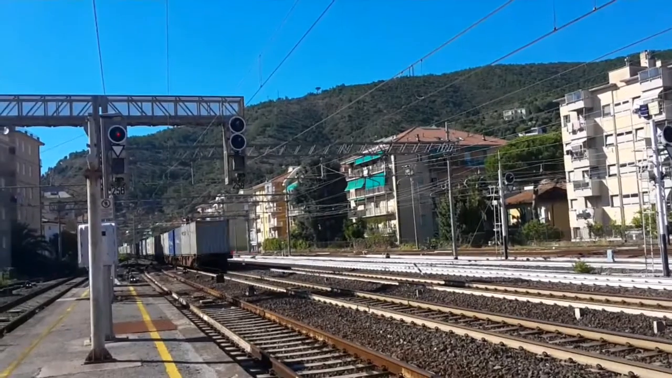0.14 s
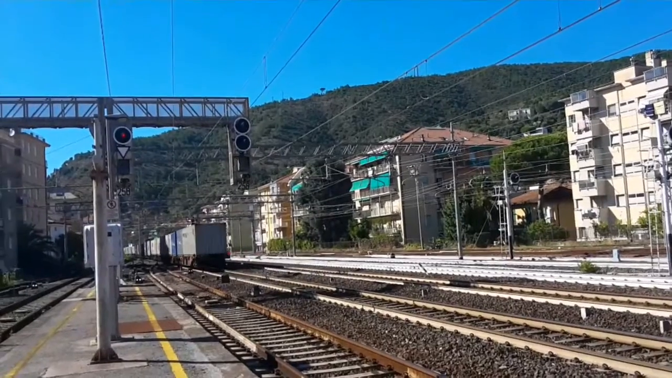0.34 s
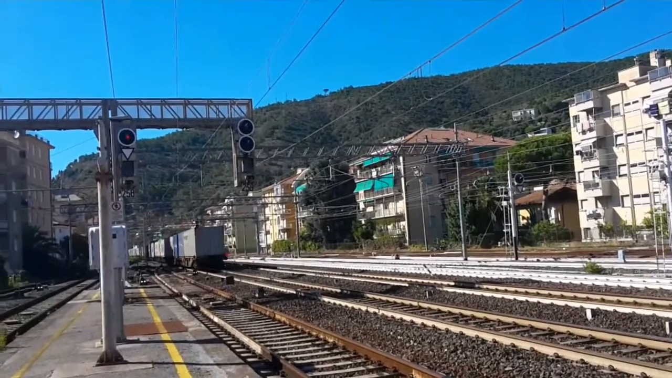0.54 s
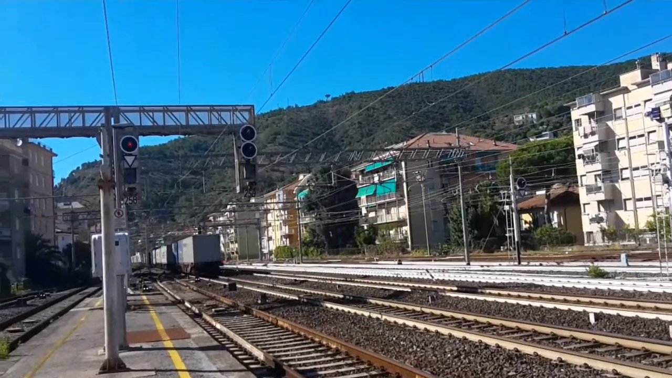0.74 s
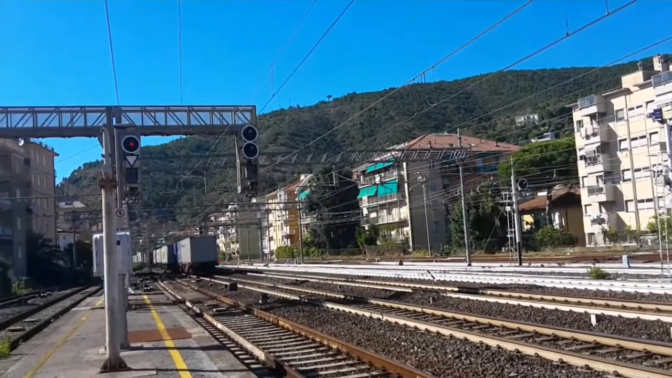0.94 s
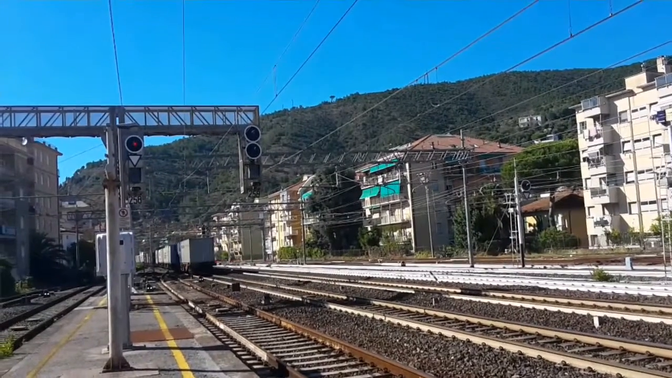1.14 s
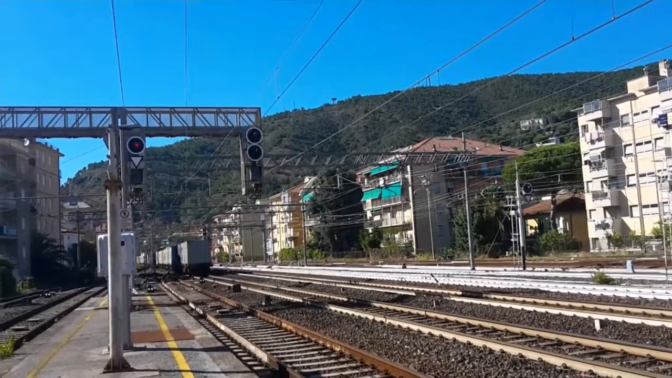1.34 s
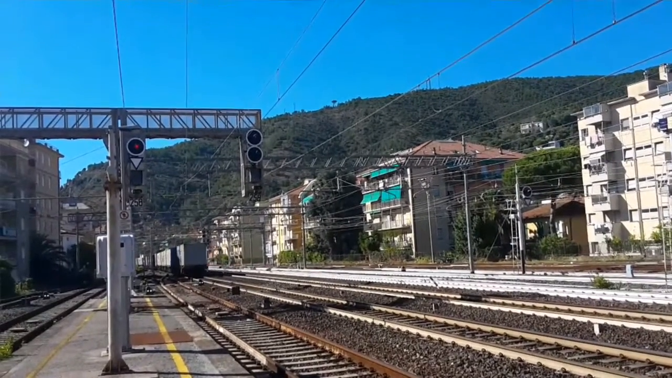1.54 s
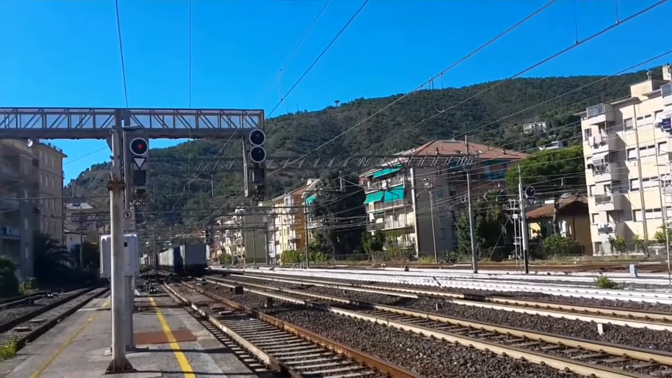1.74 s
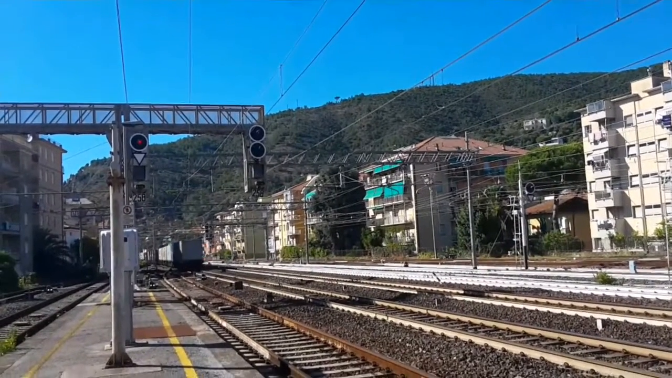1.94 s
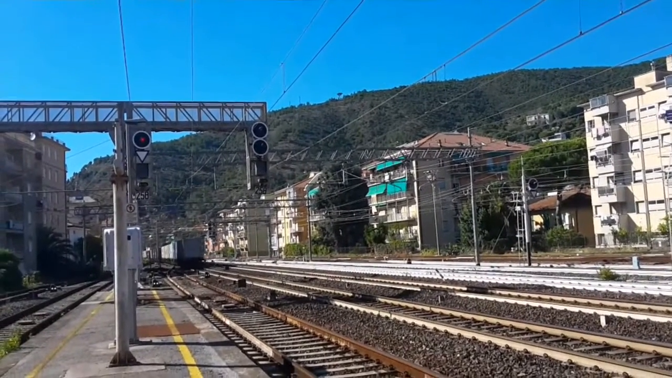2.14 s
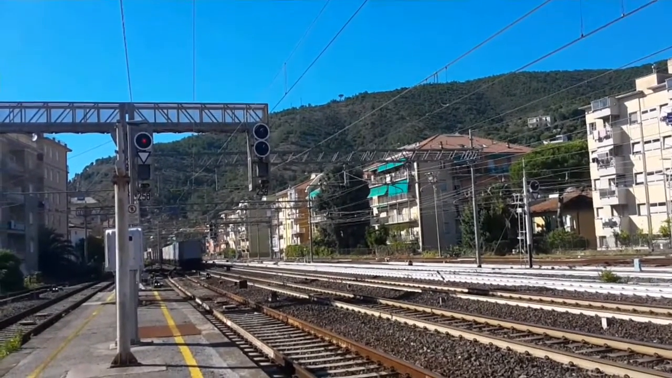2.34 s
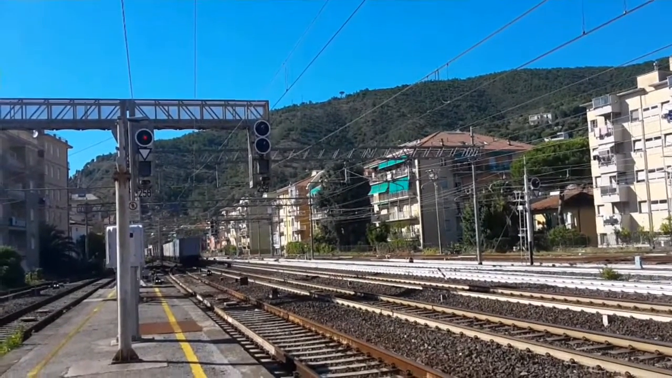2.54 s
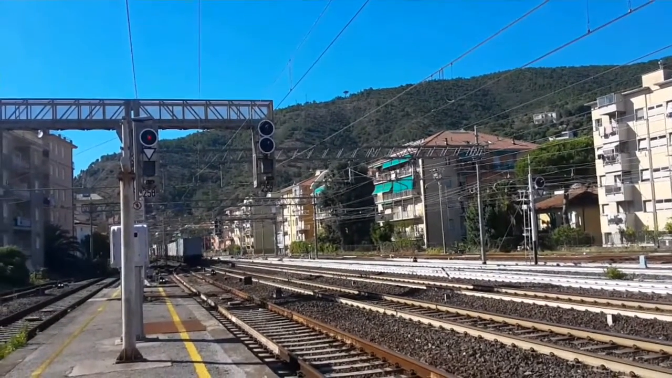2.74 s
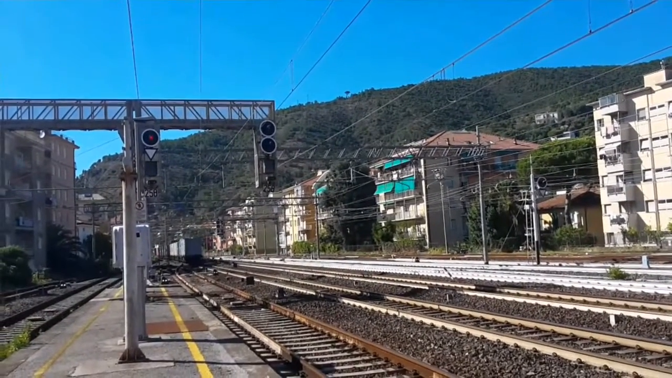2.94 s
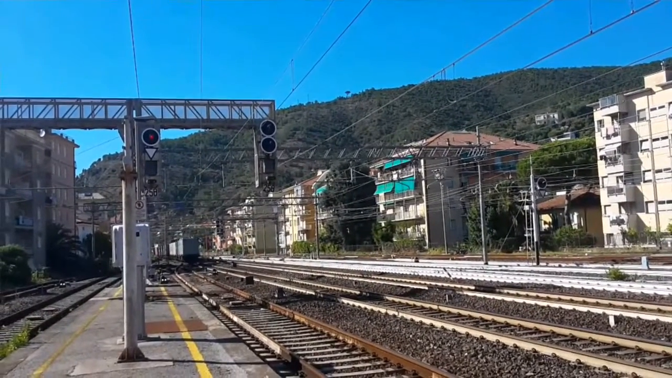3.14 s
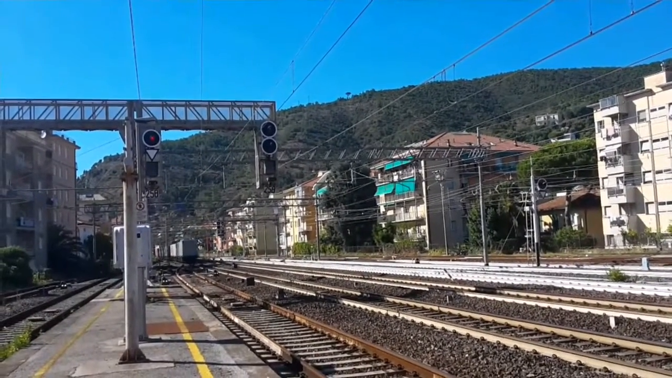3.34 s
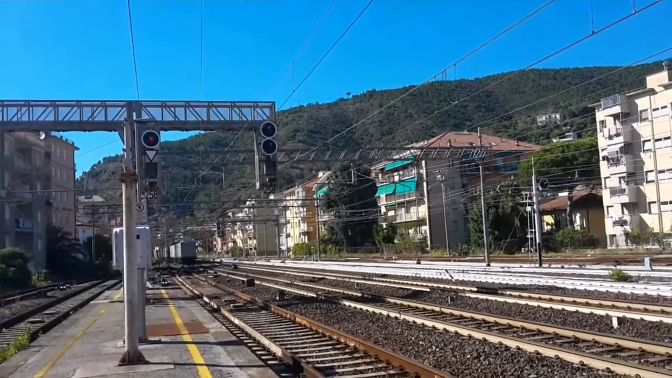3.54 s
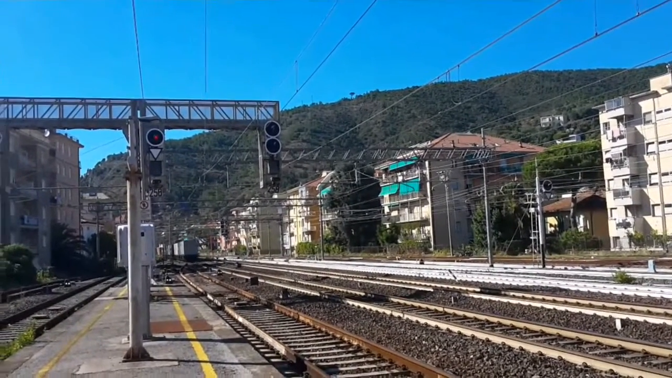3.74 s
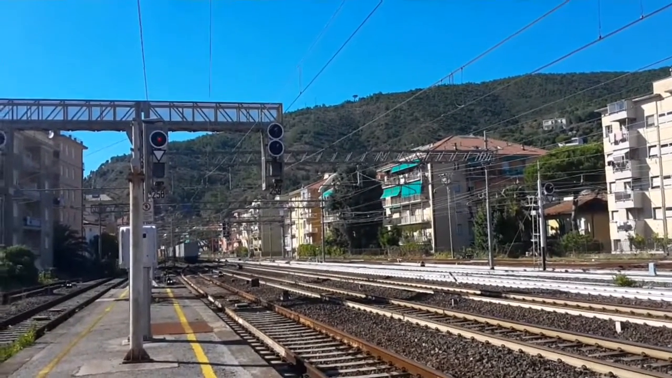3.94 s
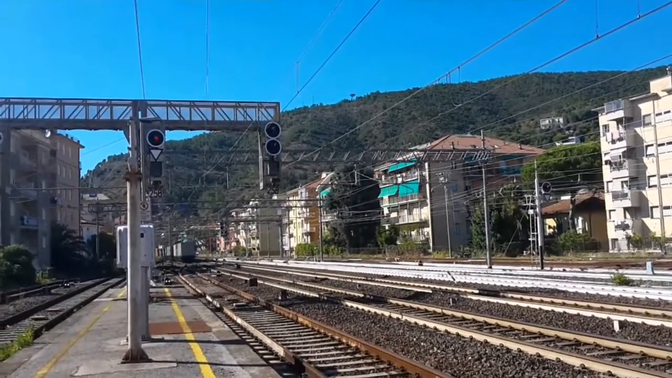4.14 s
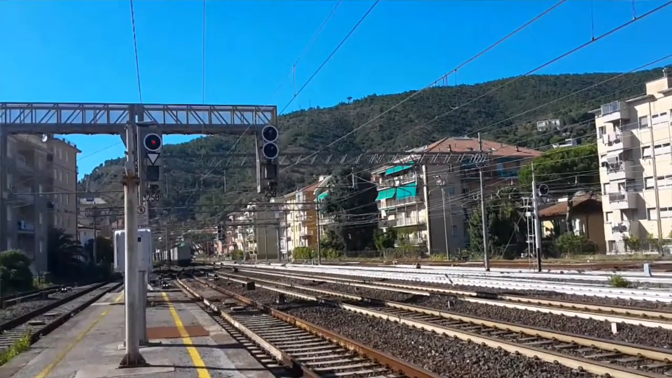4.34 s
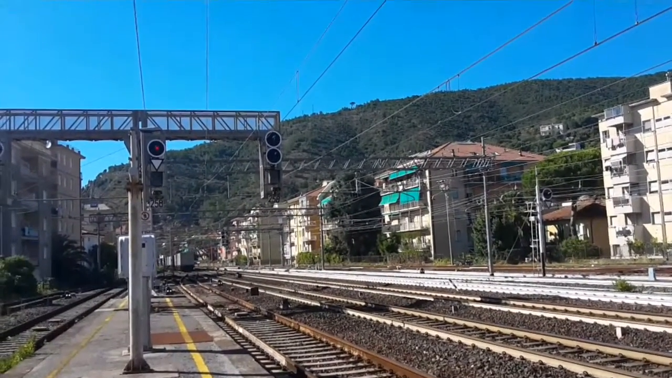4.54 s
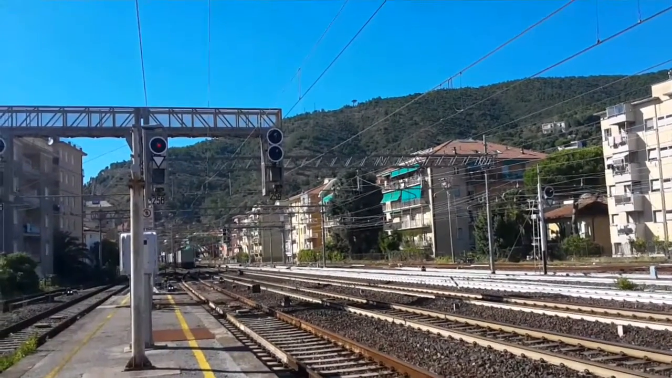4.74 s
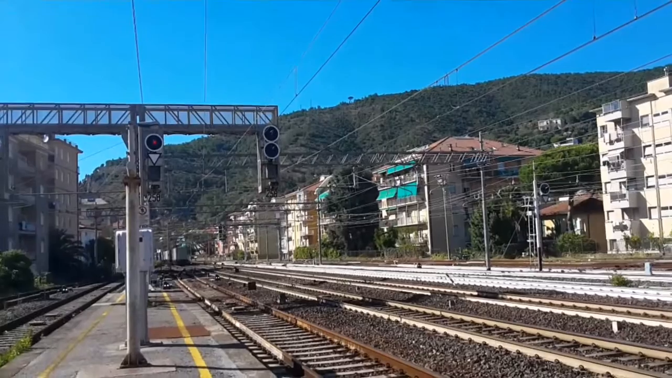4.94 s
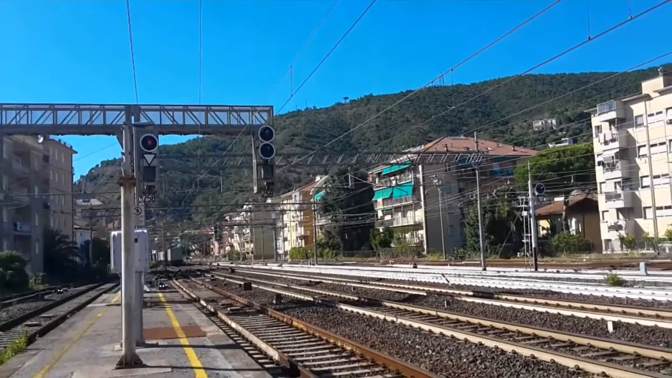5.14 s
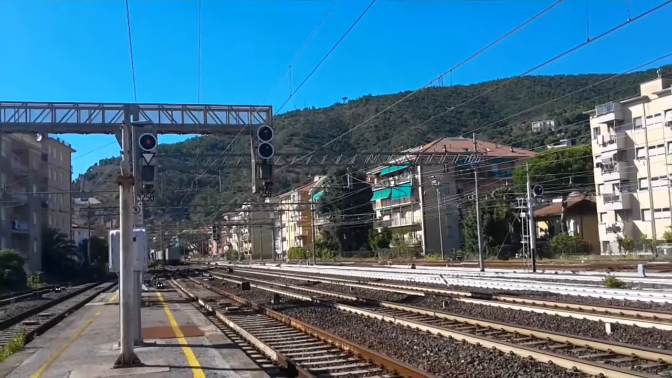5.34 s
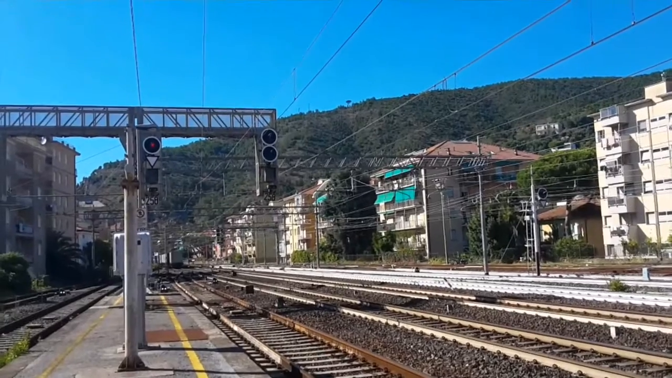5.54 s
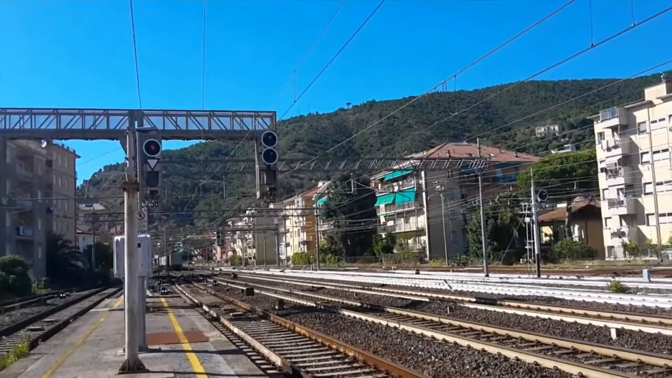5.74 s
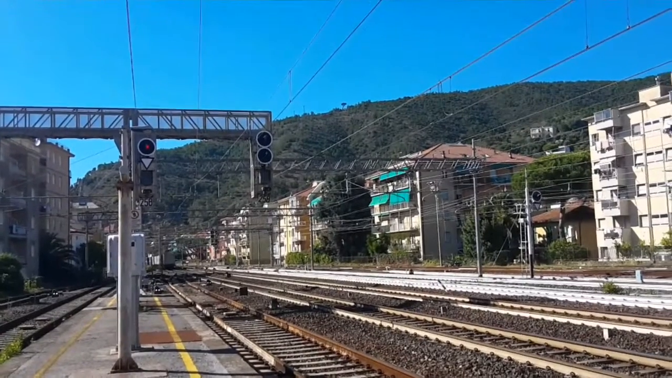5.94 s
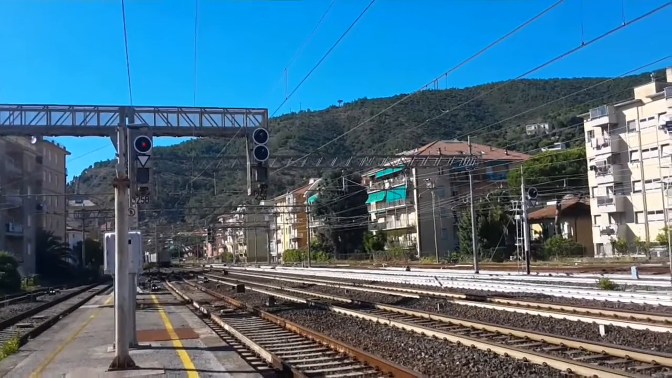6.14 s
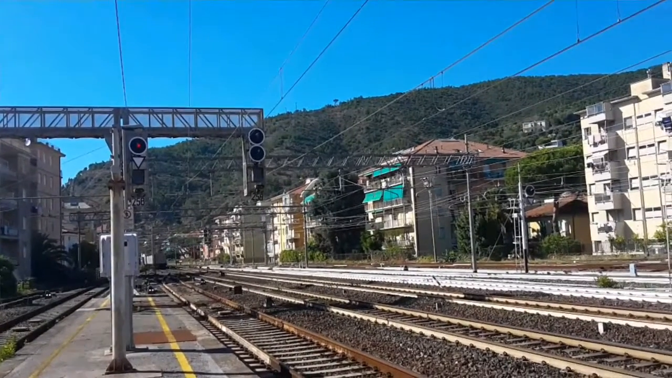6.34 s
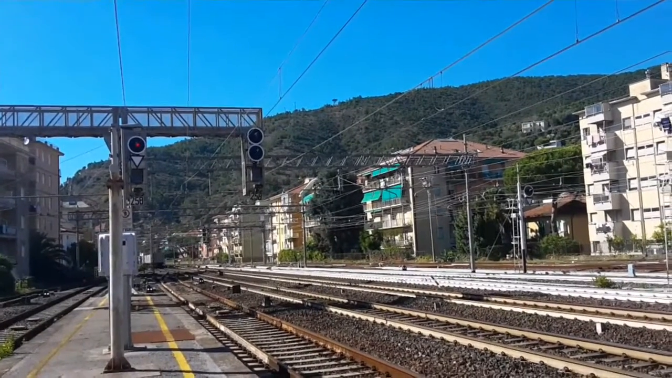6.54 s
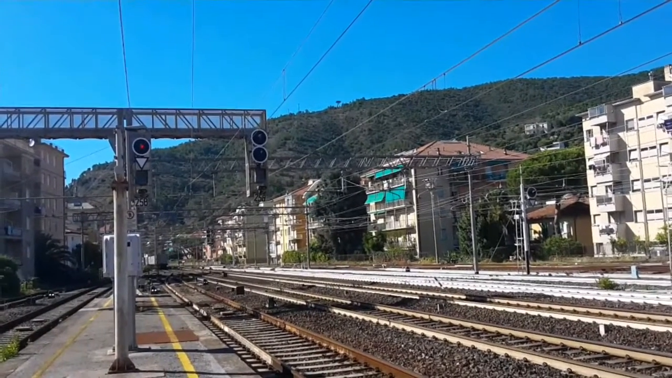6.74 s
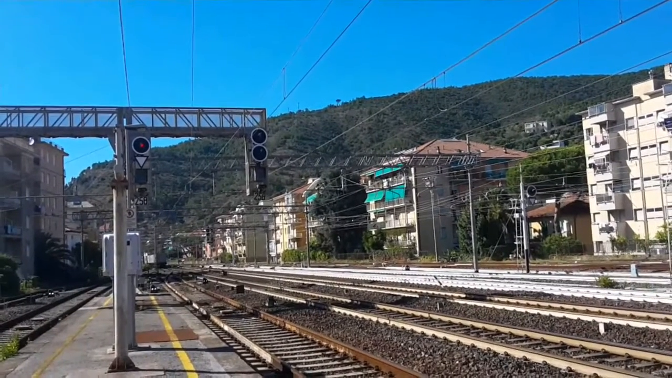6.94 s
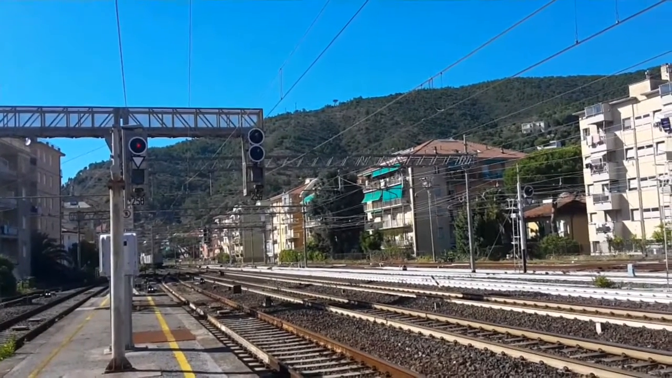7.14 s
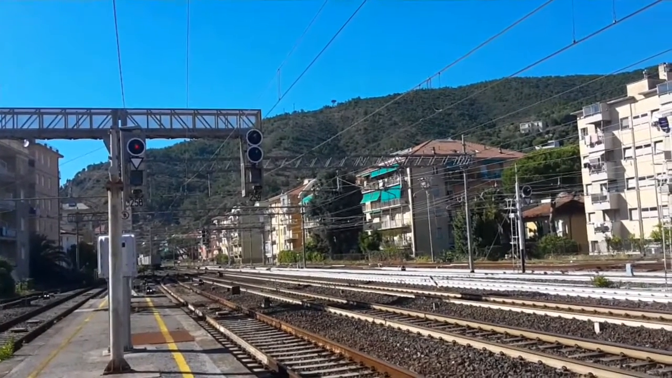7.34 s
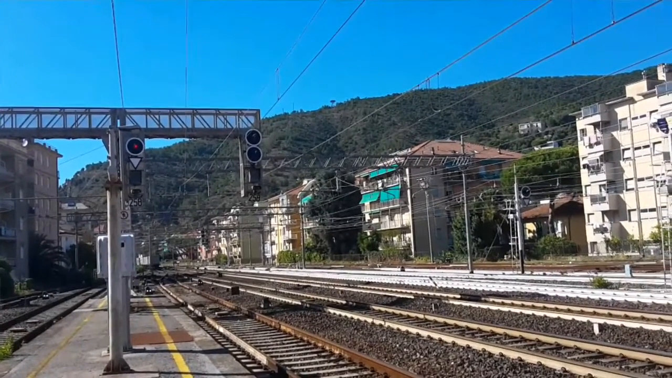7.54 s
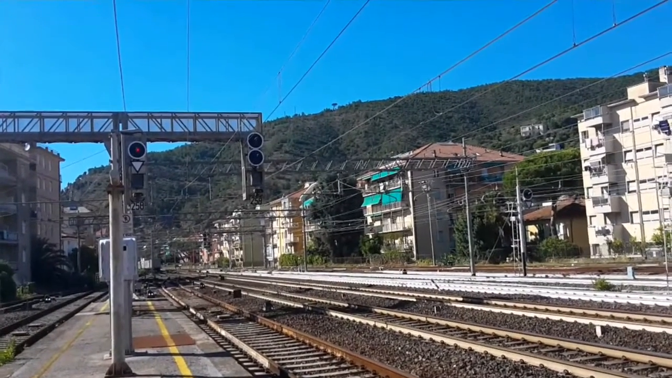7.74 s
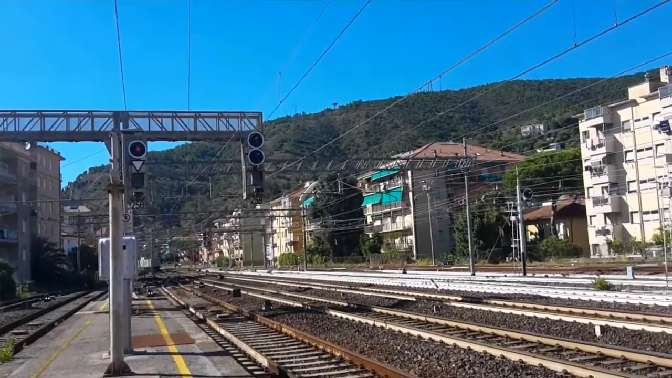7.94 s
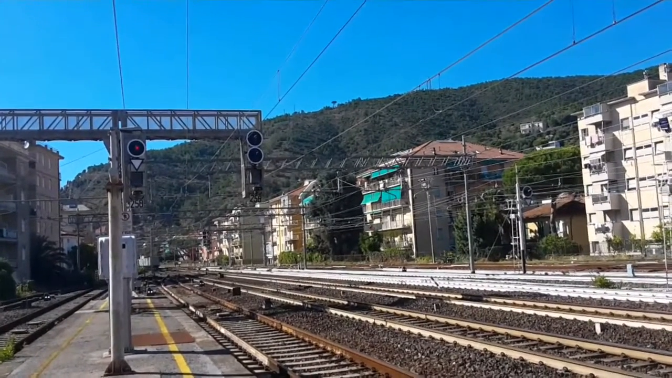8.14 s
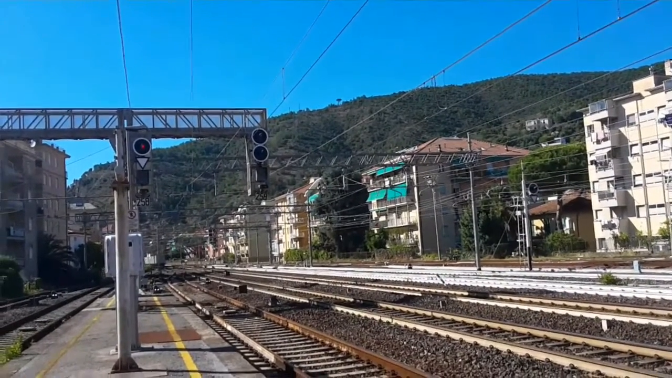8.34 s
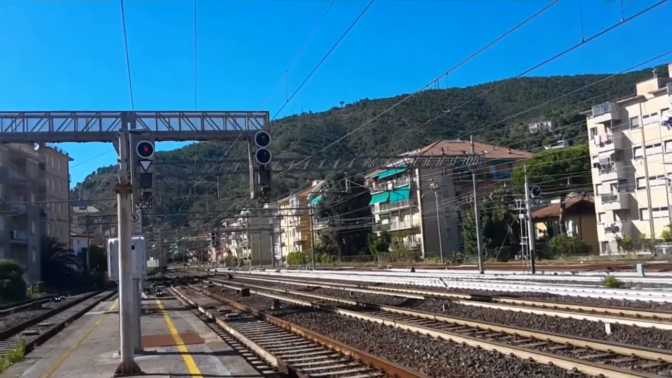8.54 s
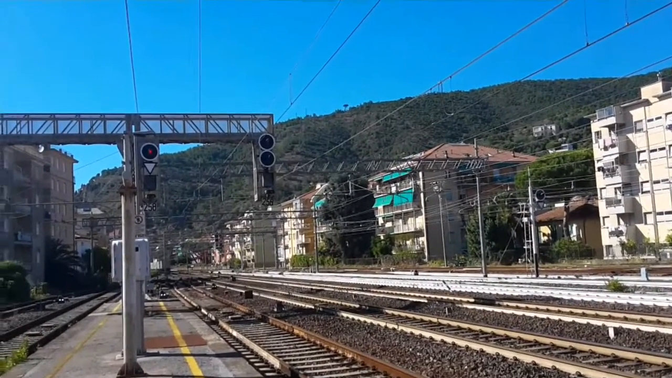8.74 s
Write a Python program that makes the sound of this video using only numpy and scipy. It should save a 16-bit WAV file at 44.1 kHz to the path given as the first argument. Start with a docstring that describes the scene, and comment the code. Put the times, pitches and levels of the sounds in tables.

```python
"""A broad rolling roar and a few loud clanks near 0.6 s open the scene: the tail of a freight train, about 75 m
down the track from a station platform and rolling away. The roar is filtered noise, one layer each for ground,
wagon bodies, sleepers, rails, wheels and two treble edges; short tone bursts, each trailed by nearby pitches,
add the clanks and brief uneven grains. The left microphone faces the track; the shielded right one hears it
weakly. Both catch wind pops, a thin high squeal and hiss."""
import sys
import numpy as np
from scipy import signal
from scipy.fft import rfft, irfft, next_fast_len
from scipy.io import wavfile
from scipy.ndimage import uniform_filter1d, map_coordinates

SR = 44100
rng = np.random.default_rng(int(sys.argv[2]) if len(sys.argv) > 2 else 0)


def output_pcm(signal):
    """Save a mono or channel-first signal as 16-bit PCM at the path in sys.argv[1].

    Samples are clipped to [-1, 1] before scaling.
    """
    pcm = np.clip(np.atleast_2d(signal).T, -1, 1) * 32767
    wavfile.write(sys.argv[1], SR, np.round(pcm).astype(np.int16))


N = 388521  # length in samples
TOP_HZ = 15720  # band limit of both channels

# Hiss colour, right then left microphone. Each row: frequency in Hz, relative level in dB per Hz.
HISS_RIGHT_COLOUR = [(5000, -26.5), (9000, -24), (9600, -11.5), (10500, -3), (12000, -0.5), (14000, 0.5),
                     (15700, -6.5)]
HISS_LEFT_COLOUR = [(9000, -120), (10000, -25), (11500, -6), (13500, -0.5), (15000, -4.5), (15700, -14)]
# Growth of the left hiss. Each row: time in seconds, level in dB.
HISS_LEFT_GROWTH = [(0, -99), (2, -97), (4, -87), (5.5, -82.5), (7, -80), (8.81, -78)]

# Wind pops. Each row: centre in seconds, right peak in dB, left peak in dB.
WIND_POPS = [(2.11, -46, -30), (2.46, -37, -34), (2.798, -46, -27), (2.839, -41, -29), (3.972, -39, -42),
             (4.071, -45, -47), (4.115, -49, -43), (4.138, -43, -46), (4.911, -42, -28), (5.796, -44, -44),
             (5.822, -36, -28), (5.852, -42.5, -28), (5.99, -41, -33), (8.4, -44, -36)]

# Bands of the squeal. Each row: centre in Hz, width in Hz, level in dB, time to fade by 20 dB in seconds.
SQUEAL_BANDS = [(12800, 400, -4, .17), (13300, 280, -12, .33), (13850, 460, 1, .28), (14620, 560, -4, .14),
                (15350, 500, -15, .06)]
SQUEAL_START_S, SQUEAL_RISE_S, SQUEAL_HOLD_S = 1.22, 0.04, 0.09
SQUEAL_DB = -63.5  # added to each band's level

# Colours of the rolling noise, from the rumble up to two treble edges.
# Each row: frequency in Hz, relative level in dB per Hz.
GROUND_COLOUR = [(13, -38), (27, -17.5), (42, -0.5), (97, -1.5), (135, -8), (180, -31.5), (300, -120)]
BODIES_COLOUR = [(74, -39.5), (125, -5.5), (199, 0.5), (330, -3.5), (430, -20), (730, -120)]
SLEEPERS_COLOUR = [(190, -31.5), (320, 0), (399, 0.5), (460, 2), (577, -3.5), (639, -9.5), (720, -16),
                   (940, -42), (1580, -120)]
RAILS_COLOUR = [(400, -28), (680, -10.5), (736, -9), (834, -4.5), (1050, -1.5), (1170, -2.5), (1260, 0),
                (1400, -3.5), (1600, -12.5), (2080, -41.5), (3520, -120)]
WHEELS_COLOUR = [(880, -30.5), (1500, -14), (1680, -3.5), (1880, 0.5), (2390, -2), (2600, 2), (2980, -4),
                 (3270, 3.5), (3420, 0.5), (3720, -9.5), (3900, -15), (5070, -43.5), (8580, -120)]
SIZZLE_COLOUR = [(3300, -120), (3750, -5.5), (4200, -0.5), (4900, -16.5), (5300, -22.5), (5700, -120)]
FRINGE_COLOUR = [(4500, -120), (5000, -0.5), (5350, 5), (5550, 4), (5800, -10), (6000, -15), (6300, -20),
                 (6500, -44), (7000, -120)]

# How each layer fades. Each row: level at the start in dB before its swells, loss to air and ground in dB
# per 100 m (negative: a gain), share of the swells taken (a factor), rms of its own wander in knots in dB.
GROUND_FADE = (-40.5, -1, 0.73, 1.5)
BODIES_FADE = (-29.5, -1, 0.5, 0.47)
SLEEPERS_FADE = (-29, 1, 1, 0.54)
RAILS_FADE = (-29, 2, 0.76, 0.44)
WHEELS_FADE = (-30, 3.5, 0.71, 0)
SIZZLE_FADE = (-40.5, 5.5, 1, 1.55)
FRINGE_FADE = (-56.5, 17.5, 2, 1.8)
WANDER_PER_S = 4  # knots a second
WHEEL_FLUTTER_DB, WHEEL_FLUTTER_PER_S = 0.7, 18  # worn treads; depth before the wheels' share of swells

# Swells of the roar. Each row: centre in seconds, rise of the wheels in dB, rise of the track in dB,
# rise of the treble in dB, length in seconds.
ROAR_SWELLS = [(0.0, 3, 3, 2, 0.17), (.3, 0.5, 1, -1.5, 0.17), (.58, -1.3, 1.5, -1, 0.19),
               (.73, 2, 1.5, 0.5, 0.098), (1.7, 0, 0, 0.5, .3), (2.14, 2.5, 0, 3, 0.36),
               (2.33, 4, 0.8, 4, 0.24), (2.7, 2.5, 1, 1, 0.82), (3.1, 3, 3, 5, 0.253),
               (3.33, 3.5, 0.5, 3.5, 0.22), (4.03, 1.5, 2.5, 1.5, 0.99), (4.85, 0, 1, -0.5, 0.21),
               (5.1, 0, 0, 1.5, .3), (5.4, 1, 0, 1, 0.25), (6.15, 1, 1.5, 1, 0.39), (6.95, 4, 1, 3.5, 0.37),
               (7.35, 2, 0.5, 1, 0.29), (7.88, 4.5, 0.5, 4.5, 0.42), (8.3, 1.5, 0, 0.5, 0.34)]
# Swells of the rumble. Each row: centre in seconds, rise of the wagon bodies in dB, rise of the ground in dB,
# length in seconds.
RUMBLE_SWELLS = [(.3, -2, 3.5, 0.19), (.68, 0.5, 1.5, 0.18), (1.3, -1.5, 4, 0.59), (2.15, 4.5, 8.5, 0.34),
                 (3.15, 3.5, 5, 0.3), (4.0, 4.5, 1, 0.46), (5.1, 3.5, 0.5, 0.57), (5.6, 0, -3, .3),
                 (5.88, 0, 5, .16), (6.3, 2, 2, 0.36), (6.95, 4.5, -0.5, 0.58), (8.0, 5, -3, 0.12),
                 (8.45, -0.5, 3, 0.19)]

START_M, SPEED_M_S = 75.1, 19.62  # distance of the last wagon at the start, speed away
HIDDEN_M, HIDDEN_DB_M = 145, 0.04  # after this run the wagons pass behind buildings; added loss per metre
HOLLOW_HZ, HOLLOW_WIDTH_HZ, HOLLOW_DB_S = 685, 280, 0.39  # a dip in the roar, deeper each second
SCATTER_DB, SCATTER_GAINS_DB_S = -0.5, 0.5353  # sound off the buildings, gaining on the direct sound

# Short tone bursts: a few loud clanks near 0.6 s, and brief uneven grains of the roar. Each row: centre in
# seconds, pitch in Hz, peak in dB, length in seconds.
TONE_BURSTS = [(.271, 87, -27.5, 0.021), (.508, 1322, -23, 0.031), (.524, 640, -21, 0.02),
               (.53, 832, -25.5, 0.041), (.535, 494, -28, 0.032), (.582, 476, -25, 0.027),
               (.603, 1254, -15, 0.009), (.616, 113, -25, 0.018), (.617, 648, -21.5, 0.025),
               (.625, 470, -14.5, 0.014), (.62, 1094, -31, 0.023), (.65, 444, -26, 0.033),
               (.7, 1320, -28, 0.014), (.705, 104, -26, 0.014), (.711, 3380, -27, 0.013),
               (.675, 1363, -29, .02), (.715, 174, -24.5, .03), (.745, 480, -23, .02),
               (.775, 199.3, -28.5, .025), (.81, 1255, -28.5, .03), (.83, 267, -27, .02),
               (.885, 218, -28, 0.024), (.826, 452, -22.5, 0.014), (1.236, 483, -24.5, 0.023),
               (1.544, 467.2, -31, 0.04), (1.995, 180, -26, 0.024), (2.03, 237.5, -27, 0.032),
               (2.09, 279, -24.5, 0.03), (2.11, 164.8, -20.5, 0.0127), (2.183, 290, -24.5, 0.015),
               (2.19, 98, -33, 0.019), (2.22, 130, -22, 0.014), (2.268, 298, -23, 0.021),
               (2.321, 3350, -30, 0.013), (2.546, 98.9, -30, .016), (2.56, 169, -22.5, 0.0086),
               (2.92, 200, -24, 0.011), (2.949, 480, -26, 0.012), (3.082, 3345, -34, .015),
               (3.379, 458.6, -30, 0.019), (5.805, 169, -31, 0.034), (5.87, 162.6, -30, 0.015),
               (5.989, 300, -27, .02), (6.182, 3514, -39, 0.014), (6.519, 3240, -42, .015),
               (6.691, 95.6, -37, .016), (6.9, 216, -27, 0.024), (7.836, 990, -36, .014),
               (7.842, 3300, -40, .015), (7.948, 1000, -38, .012)]
# Rattle with each burst: level under it in dB, pitch spread as a share, time scale in lengths of the burst.
RATTLE_DB, RATTLE_SPREAD, RATTLE_LASTS = -13, 0.2, 1.5
# A wheel sings briefly. Each row: centre in seconds, pitch in Hz, peak in dB, length in seconds.
WHEEL_RINGS = [(2.16, 2090, -38.5, .14), (2.29, 1885, -37, 0.063), (2.29, 2650, -41, 0.056),
               (2.37, 2590, -41, 0.14)]

# How the shielded microphone hears the track. Each row: frequency in Hz, gain in dB.
SHIELD_GAIN = [(90, -29), (200, -27.5), (480, -25), (730, -22.5), (1090, -20), (1600, -21), (1950, -26.5),
               (2500, -22), (3050, -31), (3300, -30), (3550, -27), (3820, -20.5), (4080, -23),
               (4250, -17.5), (4680, -10), (5100, -9), (5600, -15.5), (6140, -17)]
# What it shares with the open one. Each row: frequency in Hz, likeness from 0 to 1, phase lead in radians.
SHARED_SOUND = [(90, .1, 1), (200, .8, .5), (480, .9, .5), (730, .45, .6), (1120, .87, .3),
                (1550, .55, -.5), (1800, .55, -.5), (1950, .1, -.8), (2280, .1, -1.2), (2450, .6, -1.3),
                (2700, .45, -.8), (3000, .15, 1.5), (3450, .5, 5), (3750, .15, 6.8), (3950, .3, 8.7),
                (4070, .1, 10.5), (4250, .65, 11.8), (4550, .2, 10.5), (4800, .3, 9.4), (5200, .2, 7.9),
                (5550, .3, 8.6), (5900, .1, 8.5)]


def amp(db):
    """Decibels to amplitude."""
    return 10 ** (np.asarray(db) / 20)


def unit(x):
    """Scale to an rms of 1."""
    return x / np.sqrt(np.mean(x ** 2) + 1e-20)


def along(points, hz):
    """The columns after the frequency, read on a log frequency axis."""
    f, *cols = np.transpose(points)
    return [np.interp(np.log(hz + 1), np.log(f + 1), c) for c in cols]


def curves(rows):
    """One value per sample for each column after the time."""
    s, *cols = np.transpose(rows)
    return [np.interp(np.arange(N) / SR, s, c) for c in cols]


def swells(rows):
    """Sums of bell-shaped rises in dB, one for each middle column."""
    t = np.arange(N) / SR
    return sum(np.outer(db, np.exp(-(2 * (t - s) / length) ** 2)) for s, *db, length in rows)


def wobble(rate):
    """A smooth curve through random knots, rate of them a second."""
    knots = rng.standard_normal(int(N * rate / SR) + 4)
    return map_coordinates(knots, [np.arange(N) * rate / SR])


def filtered(x, response):
    """Multiply the spectrum of x by a complex response of frequency."""
    m = next_fast_len(N + SR // 2)  # padded, so the end does not wrap onto the start
    return irfft(rfft(x, m) * response(np.fft.rfftfreq(m, 1 / SR)), m)[..., :N]


def rush(colour, patchy_db):
    """Two unrelated coloured noises of joint rms 1 that share time-frequency patches of random gain."""
    z = signal.stft(rng.standard_normal((2, N)), nperseg=512)[2]
    field = rng.standard_normal(z.shape[1:])
    field = uniform_filter1d(field, size=5, axis=0)  # smooth over frequency
    field = uniform_filter1d(field, size=16, axis=1)  # smooth over time
    pair = signal.istft(z * amp(patchy_db * unit(field)), nperseg=512)[1][:, :N]
    return unit(filtered(pair, lambda hz: amp(along(colour, hz)[0])))


def bursts(rows):
    """Short bell-shaped swells of one pitch, of either polarity."""
    out = np.zeros(N)
    t = np.arange(-8000, 8000) / SR
    phases = np.pi * rng.integers(2, size=len(rows))
    for (s, hz, db, length), phase in zip(rows, phases):
        envelope = np.exp(-(2 * t / length) ** 2)
        start = round((s + t[0]) * SR)
        out[start:][:len(t)] += amp(db) * envelope * np.sin(2 * np.pi * hz * t + phase)
    return out


def hiss():
    """Faint treble noise in each channel; on the left it is patchier and grows."""
    left = amp(curves(HISS_LEFT_GROWTH)[0]) * rush(HISS_LEFT_COLOUR, patchy_db=4.0)[0]
    right_colour = [(4000, -120), *HISS_RIGHT_COLOUR]  # closed off below
    right = amp(-74.0) * rush(right_colour, patchy_db=1.0)[0]
    return np.array([left, right])


def wind():
    """Each eddy pushes a diaphragm for about one slow cycle; low noise buffets the right microphone."""
    right = bursts([(s, 95, db, .011) for s, db, _ in WIND_POPS])
    left = bursts([(s, 100, db, .012) for s, _, db in WIND_POPS])
    buffet_colour = [(15, -40), (30, -16), (60, -3), (100, 0), (170, -10), (300, -40), (400, -120)]
    buffet = amp(-63) * rush(buffet_colour, patchy_db=1.5)[0]
    return np.array([left, right + buffet])


def squeal():
    """Narrow patchy noise bands rise, hold and fade at their own pace, the top one fastest."""
    t = np.arange(N) / SR - SQUEAL_START_S
    fading_s = np.clip(t - SQUEAL_RISE_S - SQUEAL_HOLD_S, 0, None)
    noise = rush([(20, 0), (20000, 0)], patchy_db=3.5)  # flat colour
    bands = np.zeros((2, N))
    for hz, width, db, fade_s in SQUEAL_BANDS:
        band = unit(filtered(noise, lambda f: 1 / (1 + ((f - hz) / width * 2) ** 4)))
        bands += amp(db - 20 * (fading_s / fade_s) ** 2) * band
    rise = np.clip(t / SQUEAL_RISE_S, 0, 1) ** 2
    sides = amp([[0], [-16]])  # far stronger on the left
    return rise * amp(SQUEAL_DB) * bands * sides


def rolling():
    """Rough wheels on rough rails: noise layers on a direct and a scattered path fade with distance and swell."""
    gone_m = SPEED_M_S * np.arange(N) / SR
    spreading_db = -20 * np.log10(1 + gone_m / START_M)
    path_db = spreading_db - HIDDEN_DB_M * np.clip(gone_m - HIDDEN_M, 0, None)
    wheels_db, track_db, treble_db = swells(ROAR_SWELLS)
    bodies_db, ground_db = swells(RUMBLE_SWELLS)
    wheels_db = wheels_db + WHEEL_FLUTTER_DB * wobble(WHEEL_FLUTTER_PER_S)

    def layer(colour, patchy_db, swell_db, fade):
        start_db, loss_db, share, wander_db = fade
        fading_db = start_db + path_db - loss_db * gone_m / 100
        moving_db = share * swell_db + wander_db * wobble(WANDER_PER_S)
        return amp(fading_db + moving_db) * rush(colour, patchy_db)

    ground = layer(GROUND_COLOUR, 1.0, ground_db, GROUND_FADE)
    bodies = layer(BODIES_COLOUR, 0.1, bodies_db, BODIES_FADE)
    sleepers = layer(SLEEPERS_COLOUR, 1.07, track_db, SLEEPERS_FADE)
    rails = layer(RAILS_COLOUR, 0.28, track_db, RAILS_FADE)
    wheels = layer(WHEELS_COLOUR, 0.05, wheels_db, WHEELS_FADE)
    sizzle = layer(SIZZLE_COLOUR, 1.0, treble_db, SIZZLE_FADE)
    fringe = layer(FRINGE_COLOUR, 1.5, treble_db, FRINGE_FADE)
    return ground + bodies + sleepers + rails + wheels + sizzle + fringe


def hollowed(x):
    """The bounce off the ballast cancels one band, the more the flatter it grazes; here deeper with time."""
    band = filtered(x, lambda hz: np.exp(-((hz - HOLLOW_HZ) / HOLLOW_WIDTH_HZ * 2) ** 2))
    kept = amp(-HOLLOW_DB_S * np.arange(N) / SR)
    return x - (1 - kept) * band


def rattle(rows, count):
    """Each burst brings a few weaker tones at nearby pitches, which swell quickly and die away."""
    out = np.zeros(N + SR)
    t = np.arange(SR // 5) / SR
    draws = rng.standard_normal((len(rows), 2, count, 1))
    for (s, hz, db, length), (detune, gain) in zip(rows, draws):
        age = t / (RATTLE_LASTS * length)
        envelope = 2 * age * np.exp(1 - 2 * age)  # peaks at 1 when age is a half
        tones = gain * np.sin(2 * np.pi * hz * np.exp(RATTLE_SPREAD * detune) * t)
        start = round((s - length / 2) * SR)
        out[start:][:len(t)] += amp(db + RATTLE_DB) * envelope * tones.sum(0) / np.sqrt(count)
    return out[:N]


def clanks_and_grains():
    """Short tone bursts with their rattle: a few loud clanks, and brief uneven grains of the roar."""
    return bursts(TONE_BURSTS) + rattle(TONE_BURSTS, count=5)


def wheel_rings():
    """A wheel sings briefly at a single pitch, swelling and fading as a bell curve."""
    return bursts(WHEEL_RINGS)


def microphones(direct, scattered):
    """The left one takes the direct sound; the right a weak, phase-shifted share of it and scattered sound."""
    def shares(hz):
        alike, lead = along(SHARED_SOUND, hz)
        gain = amp(along(SHIELD_GAIN, hz)[0])
        return gain * [alike * np.exp(1j * lead), np.sqrt(1 - alike ** 2)]

    right = filtered(np.array([direct, scattered]), shares).sum(0)
    return np.array([direct, right])


def scene():
    """Hiss, wind and squeal under the train as the two microphones hear it."""
    background = hiss() + wind() + squeal()
    direct, scattered = rolling()
    scattered = scattered * amp(SCATTER_DB + SCATTER_GAINS_DB_S * np.arange(N) / SR)
    train = hollowed(direct) + clanks_and_grains() + wheel_rings()
    return background + microphones(train, scattered)


def record(dry):
    """Nothing is kept above the band limit."""
    return filtered(dry, lambda hz: hz < TOP_HZ)


dry = scene()
out = record(dry)
output_pcm(out)
```